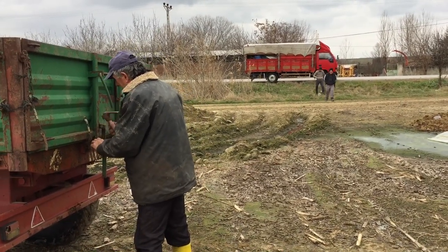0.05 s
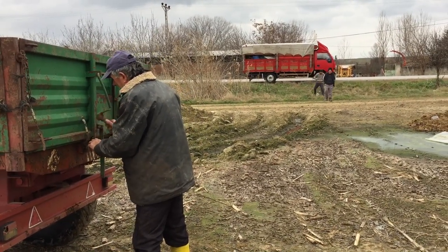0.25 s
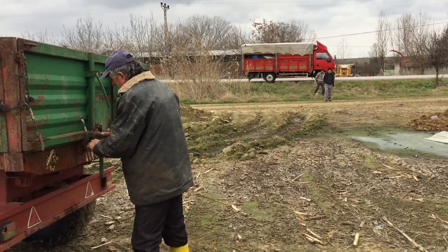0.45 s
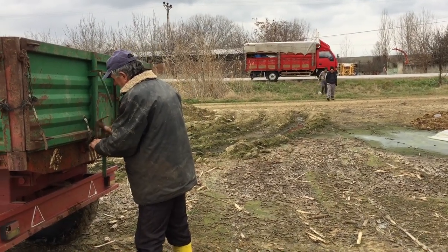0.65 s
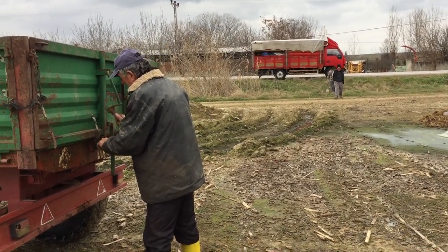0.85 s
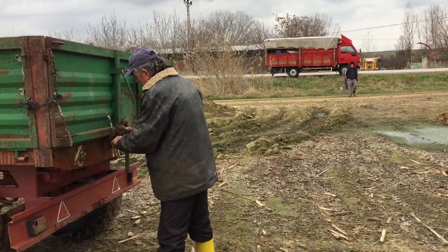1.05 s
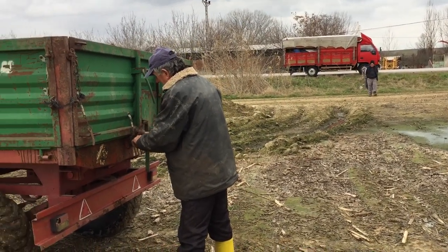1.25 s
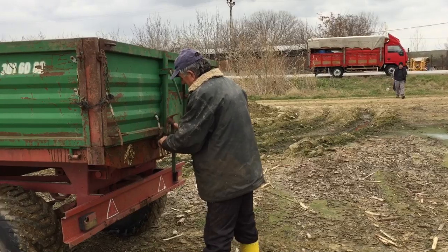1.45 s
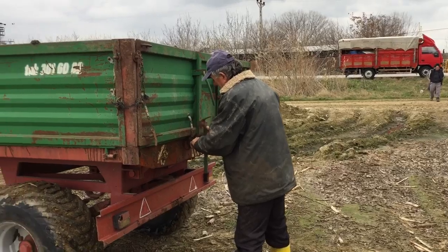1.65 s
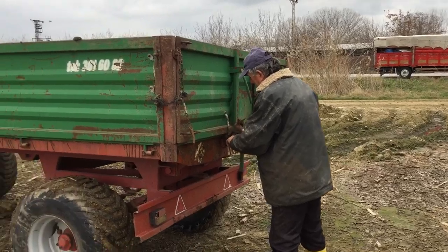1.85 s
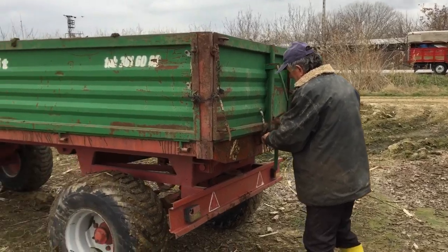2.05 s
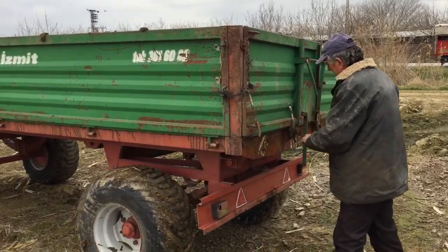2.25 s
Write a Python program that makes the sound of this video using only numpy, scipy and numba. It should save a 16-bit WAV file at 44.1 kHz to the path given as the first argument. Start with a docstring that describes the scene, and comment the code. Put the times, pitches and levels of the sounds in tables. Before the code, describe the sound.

A steel latch is banged by hand on a trailer tailgate in quick, steady metallic clanks

```python
"""A steel latch banged by hand against a trailer tailgate, over three blows a second, a few metres from a phone.
Each blow rings decaying modes: the pings of latch and pin, the clang and boom of the ribbed side panels.
Shaped noise sends the blows back as thin scattered tails and faint slaps from far sheds.
Beneath lies the low rumble of an open farmyard, made of noise bands; the phone overloads on the loud peaks."""
import sys
import numpy as np
from scipy import signal
from scipy.io import wavfile
from scipy.ndimage import uniform_filter1d
from numba import njit

SR = 44100
rng = np.random.default_rng(int(sys.argv[2]) if len(sys.argv) > 2 else 0)


def persist_wave(psi):
    """Save psi, clipped to +-1, as 16-bit WAV."""
    counts = np.round(np.clip(psi, -1, 1) * 32767).astype(np.int16)
    wavfile.write(sys.argv[1], SR, np.atleast_2d(counts).T)


N = 101429  # samples
LEAD = SR // 2  # samples rendered ahead of the start, so that an earlier blow can ring on


def undb(db):
    """Gain of a level in dB."""
    return 10 ** (np.asarray(db) / 20)


def along(hz, at_hz, values):
    """Values interpolated on a log-frequency axis."""
    return np.interp(np.log(hz), np.log(at_hz), values)


def band(x, hz, width_hz):
    """Gentle resonant band-pass."""
    return signal.lfilter(*signal.iirpeak(hz, hz / width_hz, fs=SR), x)


def unit_energy(x):
    """The same signal with its squares summing to one."""
    return x / np.sqrt(np.sum(x ** 2))


RUMBLE_DB = -36.5  # RMS level of the whole rumble
FLICKER_DB, FLICKER_HZ = 3, 9  # spread of each band's level, new random levels per second
# Spectrum of the open yard between blows: centre_hz, relative level_db
YARD_SPECTRUM = [(25, -14), (60, 0), (150, 3), (240, 0), (400, -10), (666, -20), (1100, -17), (1600, -25),
                 (2500, -28), (4000, -34), (6300, -47), (10000, -58), (15500, -62)]


def rumble():
    """Distant engines, road and air: half-octave noise bands, each flickering in level on its own."""
    centre_hz, level_db = np.array(YARD_SPECTRUM).T
    hold = int(SR / FLICKER_HZ)
    out = np.zeros(N)
    for hz in 30 * 2 ** np.arange(0, 9.1, .5):
        # random levels joined by straight lines
        steps = np.repeat(rng.standard_normal(400), hold)
        flicker = uniform_filter1d(steps, hold)[:N]
        noise = band(rng.standard_normal(N), hz, hz / 2)
        noise = band(noise, hz, hz / 2)
        out += undb(along(hz, centre_hz, level_db) + FLICKER_DB * flicker) * noise
    return out * undb(RUMBLE_DB) / np.sqrt(np.mean(out ** 2))


# Scattered returns, from the trailer's underside and the ground, then from hedges and walls:
# level_db, t60_s, low_hz, high_hz
SCATTERED_RETURNS = [(-22, 0.14, 2500, 13000), (-45, 0.59, 700, 5800)]
# Slaps from far sheds: delay_s, level_db, smear_s, centre_hz, width_hz
SHED_SLAPS = [(.137, -58, .008, 3500, 5000), (.169, -48, .003, 3600, 7000), (.169, -45, .002, 1200, 800)]


def yard(x):
    """Outdoor reflections: the blows convolved with decaying noise tails and late smeared bursts."""
    t = np.arange(2 * LEAD) / SR
    reply = np.zeros(len(t))
    for level_db, t60_s, low_hz, high_hz in SCATTERED_RETURNS:
        decay = undb(-60 * t / t60_s)
        build_up = 1 - np.exp(-t / .005)
        tail = rng.standard_normal(len(t)) * decay * build_up
        band_pass = signal.butter(2, [low_hz, high_hz], "band", fs=SR, output="sos")
        reply += undb(level_db) * unit_energy(signal.sosfilt(band_pass, tail))
    for delay_s, level_db, smear_s, centre_hz, width_hz in SHED_SLAPS:
        decay = (t >= delay_s) * np.exp(-np.maximum(t - delay_s, 0) / smear_s)
        burst = rng.standard_normal(len(t)) * decay
        burst = band(band(burst, centre_hz, width_hz), centre_hz, width_hz)
        reply += undb(level_db) * unit_energy(burst)
    return x + signal.fftconvolve(x, reply)[:len(x)]


@njit
def ring(pole, rise, gain, size):
    """Sum of decaying modes, each building up at its own rate."""
    out = np.zeros(size)
    for m in range(len(pole)):
        z, remaining = gain[m], 1.
        for i in range(size):
            out[i] += z.imag * (1 - remaining)
            z, remaining = z * pole[m], remaining * rise[m]
            if i & 255 == 0 and abs(z) < 1e-5:  # too faint to go on
                break
    return out


LATCH_SPLIT = 3  # loose parts split each clear mode into a close group
PANEL_COUNT, T60_SPREAD = 1100, .1  # modes, spread of the natural log of their t60
# Clear modes of latch, pin and gate: pitch_hz, relative level_db, usual t60_s
LATCH_MODES = [(95.6, -2.5, 0.31), (154.7, -4, 0.54), (262.5, -7, 0.42), (288.5, -4.5, .38),
               (374.8, -6.5, 0.33), (927, -5, 0.1), (1097, -7, 0.17), (1290, -8.5, 0.076),
               (1540, -11, 0.14), (2534, -5, 0.16), (3600, -4.5, 0.1), (3990, -10.5, 0.091),
               (4440, -11, .07), (5150, -11, 0.13), (7320, -8, 0.098), (11500, -7, .025), (12420, 2, 0.033),
               (11690, -4, 0.036)]
# Crowd of small modes in the ribbed panels: pitch_hz, relative level_db of each mode, usual t60_s, build_up_s
# (the build-up column serves the latch modes too)
PANEL_MODES = [(60, -10.5, 0.34, 0.017), (142, -1, 0.29, 0.029), (285, -2.5, 0.19, 0.0061),
               (615, -4, 0.18, 0.015), (1107, -7, 0.15, 0.0051), (2440, -9.5, .13, 0.0038),
               (4500, -11, 0.074, 0.00093), (8130, -17, 0.054, 0.0007), (12400, -22.5, .04, 0.00025),
               (15500, -27, 0.044, .0007)]


def steel_modes():
    """Pitch, level, t60 and per-sample build-up factor of the latch modes, then of the panel crowd."""
    latch_hz, latch_db, latch_t60 = np.repeat(LATCH_MODES, LATCH_SPLIT, axis=0).T
    panel_hz, panel_db, panel_t60, build_up_s = np.array(PANEL_MODES).T
    place = (np.arange(PANEL_COUNT) + rng.random(PANEL_COUNT)) / PANEL_COUNT
    crowd_hz = 60 + 15500 * place ** 1.4  # denser towards the low end
    t60_chance = np.exp(T60_SPREAD * rng.standard_normal(PANEL_COUNT))
    crowd_t60 = along(crowd_hz, panel_hz, panel_t60) * t60_chance
    hz = np.r_[latch_hz, crowd_hz]
    db = np.r_[latch_db, along(crowd_hz, panel_hz, panel_db)]
    t60 = np.r_[latch_t60, crowd_t60]
    rise = np.exp(-1 / (SR * along(hz, panel_hz, build_up_s)))
    return hz, db, t60, rise


STEEL_DB = -3.5  # added to every mode
CLANG_DB, CLANG_OCTAVES = 6, .11  # lift of modes near a blow's boom and clangs, and its half-width
LATCH_SCATTER_DB, PANEL_SCATTER_DB = 2.5, 3.5  # chance spread of mode levels from blow to blow
DETUNE = .007  # chance spread of every mode's pitch, as a share of it
EARLY_S = -.074  # start of the blow that falls before the start and rings on
# Blows on the tailgate, two of them very faint ticks:
# start_s, boom_hz (strongest boom), low_clang_hz, high_clang_hz, ring_length (share of the usual t60),
# then eight columns of strength_db, one for each range of STRENGTH_HZ
LATCH_BLOWS = [(2.0, 280, 1100, 13000, 1.4, -73, -76, -70.5, -72, -65, -51, -46, -65),
               (2.283, 280.5, 1200, 3800, 1., -69.5, -69.5, -59.5, -39, -48, -50.5, -54.5, -61.5),
               (EARLY_S, 280, 1100, 3600, 1., -22, -16, -17, -13, -17, -17, -13, -10)] + [ r[:1] + r[2:] for r in [(0.214, 4, 273.3, 1010, 3120, 1.095, -21.5, -13.5, -15, -10, -14, -11.5, -11, -8),
               (0.504, 4, 286, 1150, 3350, 1.024, -21.5, -13, -18, -14, -14, -14.5, -11.5, -11),
               (0.795, 4, 279.6, 1680, 4220, 1.01, -22, -13.5, -18.5, -16, -12, -11.5, -10.5, -10.5),
               (1.081, 4, 269.5, 1290, 3620, 0.99, -22, -16, -18, -14, -11, -12, -11.5, -7),
               (1.362, 4, 276, 1110, 2730, 0.95, -25, -20, -21, -13, -11, -13, -12.5, -6),
               (1.608, 4, 382, 1540, 3096, 0.96, -25.5, -23.5, -23.5, -12.5, -16, -14, -14, -7),
               (1.816, 5, 435, 1150, 3740, 0.98, -30, -21.5, -22.5, -13.5, -14, -11.5, -13.5, -10),
               (1.996, 3, 449, 1540, 5270, 1.04, -35, -19, -17, -20, -14.5, -12.5, -15, -20.5)]]
# Centres of the strength ranges: centre_hz
STRENGTH_HZ = [120, 300, 600, 1150, 2300, 4500, 8500, 12200]


def steel():
    """Every blow rings the same modes, with its own strength by range, its own clangs and chance shares."""
    hz, db, t60, rise = steel_modes()
    latch_count = len(LATCH_MODES) * LATCH_SPLIT
    scatter_db = np.where(np.arange(len(hz)) < latch_count, LATCH_SCATTER_DB, PANEL_SCATTER_DB)
    out = np.zeros(N + 3 * LEAD)
    for start_s, boom_hz, low_clang_hz, high_clang_hz, ring_length, *strength_db in LATCH_BLOWS:
        size_chance, tune_chance, phase_turns = rng.standard_normal((3, len(hz)))
        clang_db = np.zeros(len(hz))
        for peak_hz in (boom_hz, low_clang_hz, high_clang_hz):
            clang_db += CLANG_DB * np.exp(-(np.log2(hz / peak_hz) / CLANG_OCTAVES) ** 2)
        # a pole turns and shrinks its mode by one sample's worth
        turn = 2j * np.pi * hz * (1 + DETUNE * tune_chance) / SR
        decay = np.log(1000) / (ring_length * t60 * SR)
        pole = np.exp(turn - decay)
        blow_db = along(hz, STRENGTH_HZ, strength_db)
        level_db = STEEL_DB + db + clang_db + blow_db + scatter_db * size_chance
        gain = undb(level_db) * np.exp(2j * np.pi * phase_turns)
        start = LEAD + int(start_s * SR)
        out[start:start + 2 * LEAD] += ring(pole, rise, gain, 2 * LEAD)
    return out[:N + LEAD]


def scene():
    """The blows and their reflections in the yard, over the rumble."""
    blows = yard(steel())[LEAD:]
    return (blows + rumble())[None]


CLIP_LEVEL, CLIP_KNEE = .98, 11.2  # ceiling (full scale = 1), hardness of the bend into it
TOP_HZ = 15671  # upper edge of the phone's passband


def record(dry):
    """Phone microphone: peaks flatten at a ceiling, then a steep low-pass cuts the top."""
    clipped = dry / (1 + np.abs(dry / CLIP_LEVEL) ** CLIP_KNEE) ** (1 / CLIP_KNEE)
    low_pass = signal.ellip(8, .2, 70, TOP_HZ, fs=SR, output="sos")
    return signal.sosfilt(low_pass, clipped)


dry = scene()
out = record(dry)
persist_wave(out)
```